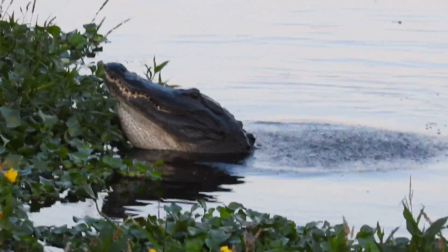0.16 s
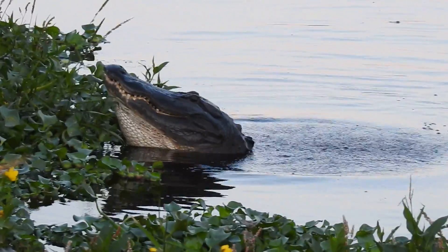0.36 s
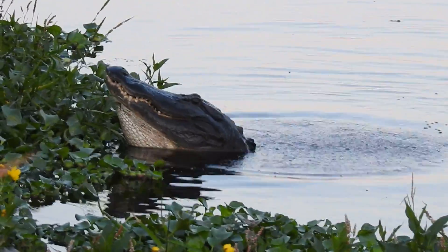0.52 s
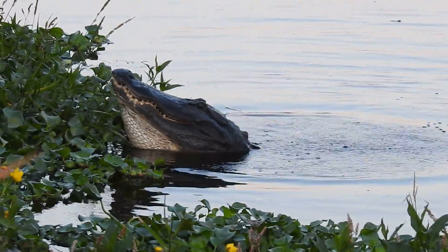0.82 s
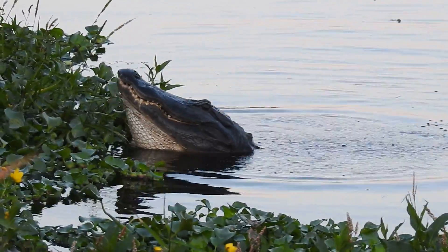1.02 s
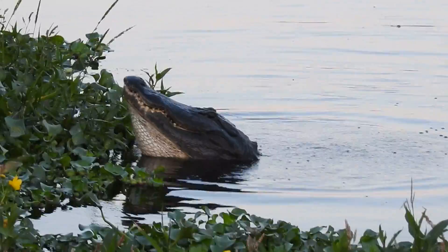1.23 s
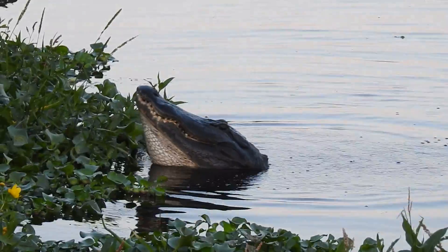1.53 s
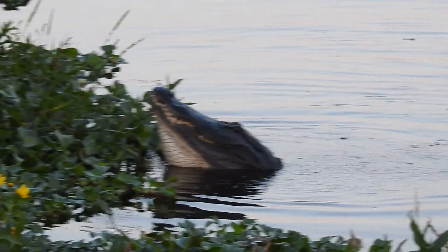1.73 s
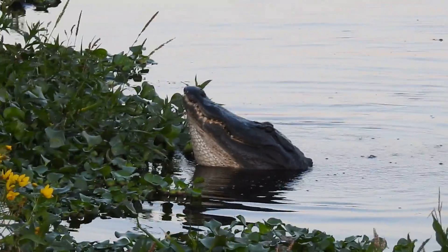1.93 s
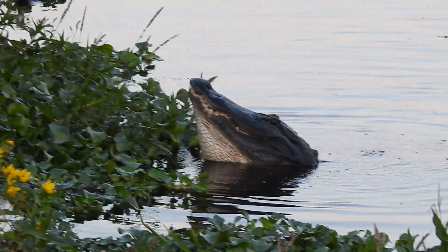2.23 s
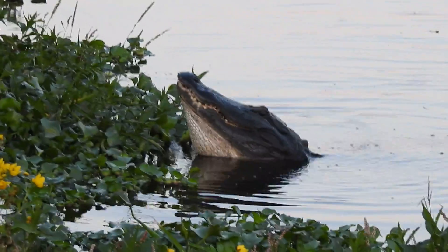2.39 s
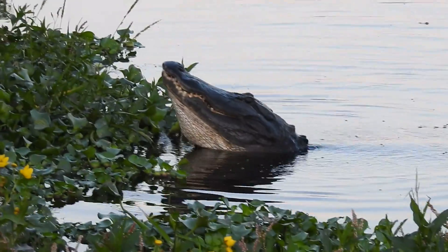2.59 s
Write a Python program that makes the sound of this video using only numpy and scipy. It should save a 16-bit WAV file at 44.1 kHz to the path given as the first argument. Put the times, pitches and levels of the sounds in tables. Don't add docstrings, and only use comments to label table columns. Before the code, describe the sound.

One alligator gives a deep, guttural, fluttering bellow, starting with soft pulses, bursting into a loud crackling roar with spattering water, then dying in separate thuds; steady insects shimmer across the open marsh, roar flattened by the recorder.

```python
import sys
import numpy as np
from scipy import signal
from scipy.io import wavfile

SR = 44100
rng = np.random.default_rng(int(sys.argv[2]) if len(sys.argv) > 2 else 0)


def unload_wav(signal):
    wavfile.write(
        sys.argv[1],
        SR,
        np.round(np.clip(np.atleast_2d(signal).T, -1, 1) * 32767).astype(np.int16),
    )


def linear_from_db(decibels):
    return 10 ** (np.asarray(decibels, float) / 20)


N = 121275

# pitch_hz, width_hz, level_db
INSECT_TONES = [(4510, 370, -3.5), (5074, 390, 3), (5410, 104, 1.5), (5630, 600, -24), (6400, 270, -52)]
INSECT_DB, THROB_HZ, THROB_DB = -49, 31, 4.0
# pitch_hz, level_db (per Hz)
MARSH_COLOUR = [(40, 1.5), (140, 7), (450, -1.5), (850, -16.5), (1310, -14.5), (3850, -24), (5260, -21.5),
                (15500, -40.5)]
MARSH_DB = -43.5
# pitch_hz, likeness (held to 0-1)
LIKENESS = [(100, -2), (1000, 1.5), (2500, 0.7), (5000, 0.97), (12000, 0.83)]
# start_s, length_s, from_hz, to_hz, level_db
CROAKS = [
    (.15, .12, 460, 440, -41),
    (.26, .13, 440, 410, -34),
    (2.3, .5, 135, 130, -43),
    (0, .05, 3650, 3250, -52),
    (0, .06, 256, 252, -47),
]

# time_s, level_db
SHAKE = [(0.0, -49), (0.27, -45.5), (0.31, -36.5), (0.32, -37), (0.4, -32), (0.99, -28), (2.14, -36),
         (2.269, -42.5), (2.75, -48)]
# pitch_hz, level_db, t60_s (time to fade by 60 dB)
SPRAY_MODES = [(1427, -10, 0.07), (1934, -18.5, 0.029), (2710, -12.5, 0.051), (3105, -5, 0.022),
               (3387, -5, 0.019), (3794, -10, 0.028), (4636, -5.5, 0.031), (4810, -11.5, 0.023),
               (5877, 7, 0.013), (6314, 4, 0.026), (6790, -6, 0.051)]
DROPS_PER_S, DROP_SPREAD_DB, RING_DB, SURGE_DB = 500, 4, 1.5, 2.5
# pitch_hz, level_db (per Hz)
FIZZ_COLOUR = [(710, -48), (1200, -1.5), (1730, -9.5), (3250, -12.5), (4020, -5.5), (6240, 2.5),
               (8700, -18.5), (15500, -44)]
FIZZ_DB, FIZZ_CUT_HZ = -2.5, 1300
# time_s, peak_db, pitch_hz, t60_s
SPLASHES = [(.308, -22, 6000, .02), (.308, -33, 1420, .12), (1.022, -29, 1420, .08),
            (1.876, -26, 1420, .15), (2.215, -40, 1400, .08), (2.338, -41, 2350, .02),
            (2.345, -40, 2900, .01), (2.25, -38, 3000, .008), (2.35, -40, 1800, .03),
            (2.41, -38, 4600, .012), (2.403, -38, 3700, .012), (2.403, -42, 2500, .012),
            (.228, -38, 3150, .06), (.004, -36, 432, .12)]

# time_s, peak_db
START_FLAPS = [(0.1209, -23), (0.173, -17.5), (0.1993, -17.4), (0.2281, -13.5), (0.2417, -19.8),
               (0.2578, -8), (0.2796, -10), (0.3054, -7.5), (0.3249, -16)]
# time_s, force_db
SAG_FLAPS = [(0.337, -9), (0.3556, -16.5), (0.3848, -13), (0.3986, -9.5), (0.4188, -9), (0.4454, -15)]
# time_s, force_db
ROAR_FLAPS = [(0.4585, 34.2), (0.4757, 33.7), (0.4871, 34.5), (0.5186, 37.7), (0.5354, 38.6), (0.5712, 37),
              (0.5875, 37.5), (0.6231, 36), (0.639, 36.2), (0.6739, 38.4), (0.69, 34.8), (0.7247, 36.4),
              (0.741, 32.3), (0.7544, 32.7), (0.7637, 35.3), (0.7755, 37.5), (0.8102, 37.1), (0.8268, 36.2),
              (0.8615, 38.4), (0.8785, 33.3), (0.8914, 36.2), (0.9009, 32.5), (0.9125, 37.7),
              (0.9478, 39.4), (0.9649, 31.4), (0.978, 34.4), (1.0002, 38.2), (1.0181, 33.2), (1.0263, 29.5),
              (1.0358, 39.9), (1.0519, 38.7), (1.0882, 38), (1.1059, 33.9), (1.1195, 35.4), (1.1422, 42.4),
              (1.1608, 31.5), (1.1744, 37.9), (1.1966, 40.2), (1.2111, 32.8), (1.234, 39.4), (1.2512, 37.7),
              (1.266, 30.7)]
# time_s, force_db
LATE_FLAPS = [(1.2795, 27.1), (1.2883, 40.4), (1.3068, 31.1), (1.3216, 34.4), (1.3362, 31.4), (1.345, 35.6),
              (1.3802, 35.8), (1.4038, 37.9), (1.4229, 29.8), (1.438, 37.2), (1.462, 37.9), (1.4813, 34.2),
              (1.4962, 38), (1.5233, 38.9), (1.5377, 34.7), (1.5569, 34.6), (1.5777, 35.4), (1.595, 35.1),
              (1.6047, 32.5), (1.6204, 35.2), (1.6462, 36), (1.6678, 32.0), (1.684, 33.4), (1.711, 36.5),
              (1.7321, 37.6), (1.7482, 34.7), (1.7759, 37.3), (1.7912, 38.6), (1.8142, 34), (1.8351, 28),
              (1.8506, 29.1), (1.8619, 36), (1.8775, 32.2), (1.9052, 35.2), (1.9248, 35.3), (1.937, 29.7),
              (1.9471, 37), (1.9708, 35.9), (1.9867, 34.2), (2.0151, 31.4), (2.0403, 34.1), (2.0551, 36.5)]
# time_s, force_db
END_FLAPS = [(2.0909, -3.5), (2.1104, 6.5), (2.1261, -2), (2.1508, 2.5), (2.1814, 4), (2.1957, -3),
             (2.2122, 0), (2.2295, -6.8), (2.2451, 1), (2.2778, 4.5), (2.2964, 4), (2.3499, 5),
             (2.3644, -9.5), (2.3889, 0.5), (2.4311, 0.5), (2.4744, 2.2), (2.5209, -6), (2.5649, -7)]
# pitch_hz, width_hz, level_db
START_CHEST = [(185.7, 15.8, -1.5), (294, 74, -22)]
# pitch_hz, width_hz, level_db
SAG_CHEST = [(151, 29, 1), (321, 27, -15.5), (223, 100, -12.5)]
# pitch_hz, width_hz, level_db
ROAR_CHEST = [(190, 52, .5), (230, 50, .5), (168, 24, -15), (258, 36, -11), (530, 130, -28)]
# pitch_hz, width_hz, level_db
END_CHEST = [(195.9, 46.7, -0.22), (207, 64.7, -0.75)]
# pitch_hz, width_hz, level_db
BELLY = [(61.4, 61, -65.5), (105, 9.8, -40.5), (151, 9.4, -14)]
# pitch_hz, width_hz, level_db
RASP = [(284, 38, -11), (410, 53, -19.5), (538, 61, -24.5), (922, 41, -32.5)]
ROAR_DB, FLAP_SOFT_HZ, BREATH_DB, CHEST_CUT_HZ = -35.5, 480, -54, 90

CRACK_DB, CRACK_GROWTH, CRACK_UNTIL_S, CRACK_HZ = -19, 1.5, 1.8, 800
REBOUND_S, REBOUND_DB = .0105, -7
SIZZLE_DB, SIZZLE_HZ = -21, 9000

WIDTH_DB, WIDTH_HZ = -12, 40
LIMIT, RELEASE_DB_PER_S, ATTACK_S, LOW_CUT_HZ = .5, 150, .0003, 50


def rms_one(x):
    return x / np.sqrt(np.mean(x ** 2) + 1e-20)


def at_hz(points, hz):
    pitches, values = np.array(points)[:, 0], np.array(points)[:, 1]
    return np.interp(np.log(hz), np.log(pitches), values)


def filtered(x, order, hz, kind):
    return signal.sosfilt(signal.butter(order, hz, kind, fs=SR, output="sos"), x)


def drift(rate_hz):
    step = 40
    r = np.exp(-2 * np.pi * step * rate_hz / SR)
    noise = rng.standard_normal(N // step + 2002)
    slow = signal.lfilter([1], [1, -2 * r, r * r], noise)[2000:]
    return np.interp(np.arange(N) / step, np.arange(len(slow)), rms_one(slow))


def ring(x, hz, width_hz):
    r = np.exp(-np.pi * width_hz / SR)
    w = 2 * np.pi * hz / SR
    return signal.lfilter([0, np.sin(w)], [1, -2 * r * np.cos(w), r * r], x + 1e-18)


def clicks(times_s, level_db):
    places = np.clip((np.asarray(times_s) * SR).astype(int), 0, N - 1)
    return np.bincount(places, linear_from_db(level_db), N)


def fading(train, seconds):
    return signal.lfilter([1], [1, -np.exp(-1 / (seconds * SR))], train + 1e-18)


def banded(colour, patchy_db):
    out = 0
    edges = 30 * 2 ** np.arange(0, 9.2, 1 / 3)
    white = rng.standard_normal((2, 2, N))
    for k, (low, high) in enumerate(zip(edges, edges[1:])):
        centre = np.sqrt(low * high)
        mid, side = filtered(white[k % 2], 2, [low, high], "band")
        alike = np.clip(at_hz(LIKENESS, centre), 0, 1)
        gain = linear_from_db(at_hz(colour, centre) + patchy_db * drift(18))
        out = out + gain * (np.sqrt(1 + alike) * mid + np.sqrt(1 - alike) * side * [[1], [-1]])
    return rms_one(out)


def marsh():
    song = 0
    for hz, width, level_db in INSECT_TONES:
        turns = THROB_HZ * np.arange(N) / SR + 0.043 * drift(2.3) + rng.random()
        throb = np.sin(2 * np.pi * turns)
        mid, side = rng.standard_normal((2, N))
        noise = np.array([mid + .3 * side, mid - .3 * side])
        tone = ring(ring(noise, hz, width), hz, width)
        song = song + rms_one(tone) * linear_from_db(level_db + THROB_DB * throb)
    return linear_from_db(INSECT_DB) * song + linear_from_db(MARSH_DB) * banded(MARSH_COLOUR, patchy_db=2.0)


def croaks():
    out, t = 0, np.arange(N) / SR
    for start, length, from_hz, to_hz, level_db in CROAKS:
        u = np.clip((t - start) / length, 0, 1)
        phase = 2 * np.pi * np.cumsum(from_hz + (to_hz - from_hz) * u) / SR
        swell = np.sqrt(np.abs(np.sin(np.pi * u))) * (u < 1)
        out = out + linear_from_db(level_db + 5.4 * drift(38)) * swell * np.sin(phase)
    return out


def spray(times_s, force_db):
    kick = fading(clicks(times_s + 0.00083, force_db), 0.014)
    surge = linear_from_db(SURGE_DB * drift(55)) * (.5 + rms_one(kick) * 0.42)
    shaking = linear_from_db(np.interp(np.arange(N) / SR, *np.transpose(SHAKE)))
    rings = np.zeros((2, N))
    for hz, level_db, t60 in SPRAY_MODES:
        lands = rng.random(N) < DROPS_PER_S * surge / SR
        sizes = linear_from_db(DROP_SPREAD_DB * np.minimum(rng.exponential(1, N), 4))
        drops = lands * sizes * rng.choice([-1, 1], N)
        lean_db = rng.normal(0, 1.85) * min(hz / 4000, 1)
        rings += ring(drops, hz, 1.96 / t60) * linear_from_db(level_db + lean_db * np.array([[1], [-1]]))
    rings = filtered(rings, 4, 7500, "low")
    fizz = filtered(banded(FIZZ_COLOUR, patchy_db=1.5), 3, FIZZ_CUT_HZ, "high")
    lone = sum(ring(clicks([when], [peak_db]), hz, 1.97 / t60) for when, peak_db, hz, t60 in SPLASHES)
    return shaking * (linear_from_db(RING_DB) * rms_one(rings) + linear_from_db(FIZZ_DB) * surge * fizz) + lone


def stages():
    roar_flaps = np.add(ROAR_FLAPS + LATE_FLAPS, [0, ROAR_DB])
    pairs = [(START_FLAPS, START_CHEST), (SAG_FLAPS, SAG_CHEST),
             (roar_flaps, ROAR_CHEST), (END_FLAPS, END_CHEST)]
    return [(*np.transpose(flap_table), chest) for flap_table, chest in pairs]


def flaps():
    trims_db = [0, 0, -4, -12]
    return np.concatenate([(s, db + trim) for (s, db, _), trim in zip(stages(), trims_db)], axis=1)


def bellow():
    voice = 0
    for k, (times_s, level_db, chest) in enumerate(stages()):
        train = clicks(times_s, level_db)
        breath = fading(train, 0.09) * rng.standard_normal(N) * linear_from_db(BREATH_DB)
        drive = -filtered(train + breath, 3, FLAP_SOFT_HZ, "low")
        if k in (1, 2):
            voice = voice - sum(linear_from_db(db) * ring(drive, hz, width) for hz, width, db in BELLY)
        drive = filtered(drive, 2, CHEST_CUT_HZ, "high")
        for j, (hz, width, db) in enumerate(chest):
            sign = -1 if j == 1 else 1
            voice = voice + sign * linear_from_db(db) * ring(drive, hz, width)
    times_s, force_db = flaps()
    puffs = clicks(times_s, 1.63 * force_db - 8.2 * (times_s > CRACK_UNTIL_S))
    air = fading(puffs, 0.018) * rng.standard_normal(N)
    rasp = sum(linear_from_db(db) * ring(air, hz, width) * np.sqrt(width / SR) for hz, width, db in RASP)
    return voice + cracks(times_s, force_db) + rasp


def cracks(times_s, force_db):
    hard = (times_s > ROAR_FLAPS[0][0]) & (times_s < CRACK_UNTIL_S)
    hit_s = times_s[hard] + 0.00208
    hit_db = CRACK_DB + CRACK_GROWTH * force_db[hard]
    rebound_db = hit_db + REBOUND_DB + 1.3 * rng.standard_normal(len(hit_s))
    crack = clicks(hit_s, hit_db) + clicks(hit_s + REBOUND_S, rebound_db)
    hiss = fading(crack, .006) * rng.standard_normal(N)
    sizzle = filtered(hiss, 2, [SIZZLE_HZ, 1.2 * SIZZLE_HZ], "band")
    snap = linear_from_db(-15.0) * ring(crack, 3000, 6000)
    return snap - ring(crack, CRACK_HZ, 540) + linear_from_db(SIZZLE_DB) * sizzle


def scene():
    times_s, force_db = flaps()
    voice = bellow()
    deep_side = linear_from_db(WIDTH_DB) * filtered(np.roll(voice, 120), 1, WIDTH_HZ, "low")
    side = deep_side + linear_from_db(-69.0) * np.roll(voice, 60)
    return marsh() + croaks() + spray(times_s, force_db) + voice + side * [[1], [-1]]


def band_limit(x):
    return signal.sosfilt(signal.butter(12, 15750, fs=SR, output="sos"), x)


def record(dry):
    x = filtered(dry, 2, LOW_CUT_HZ, "high")
    over_db = np.maximum(20 * np.log10(np.abs(x).max(0) / LIMIT + 1e-9), 0)
    ramp = RELEASE_DB_PER_S * np.arange(N) / SR
    held_db = np.maximum.accumulate(over_db + ramp) - ramp
    r = np.exp(-1 / (ATTACK_S * SR))
    cut_db = signal.lfilter([1 - r], [1, -r], held_db)
    return band_limit(x * linear_from_db(-cut_db))


dry = scene()
out = record(dry)
unload_wav(out)
```